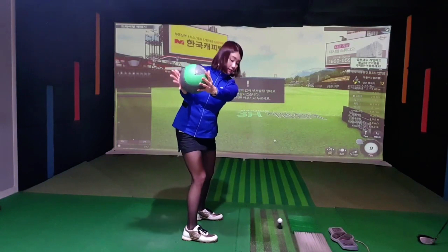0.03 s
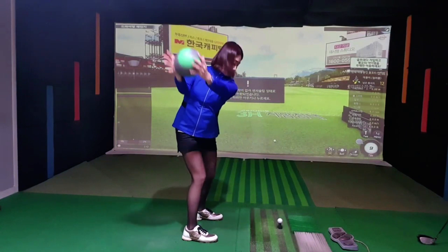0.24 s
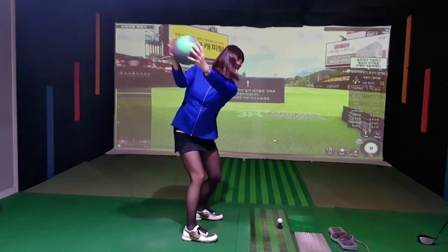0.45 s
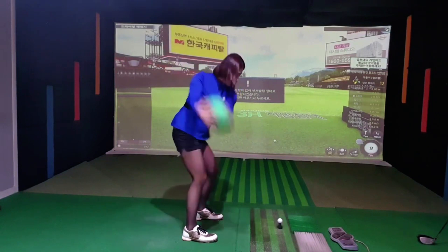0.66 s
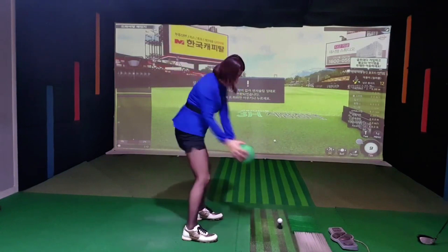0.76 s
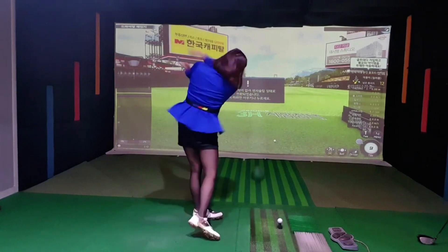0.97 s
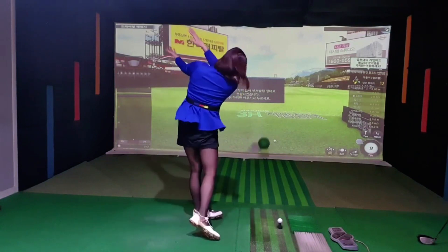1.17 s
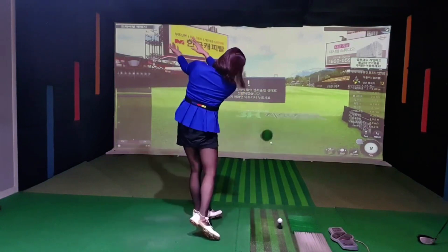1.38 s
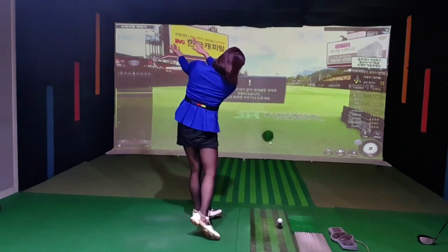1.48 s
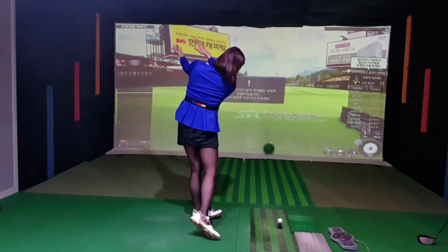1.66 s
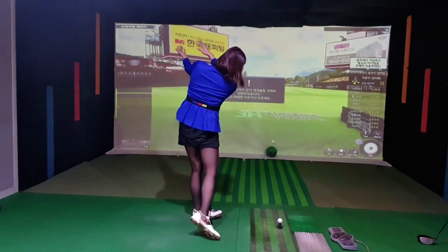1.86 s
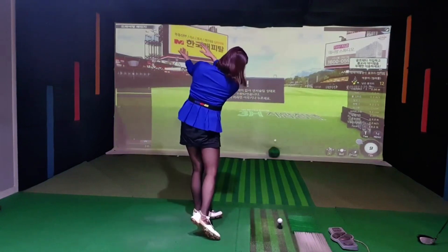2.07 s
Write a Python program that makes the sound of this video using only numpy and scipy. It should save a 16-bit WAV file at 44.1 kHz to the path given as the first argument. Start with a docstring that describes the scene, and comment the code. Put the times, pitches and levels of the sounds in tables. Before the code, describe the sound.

Deep booming thud of a heavy ball against a stretched cloth screen, followed by a lighter knock

```python
"""Inside a padded golf booth, a stereo pair of microphones hears ventilation (steady coloured noise) throughout.
A jacket swishes (rubbing noise) and the arms whoosh; a heavy rubber ball slaps the hanging screen (noise burst).
The ball's air rings, the screen thumps and snaps taut again (damped modes), and the booth booms on in the bass.
The ball knocks more lightly on the mat, the screen slides back with a hiss and a soft low bump,
and a soft scuff ends in a short tap."""
import sys
import numpy as np
from scipy.fft import rfft, irfft, next_fast_len
from scipy.io import wavfile
from scipy.ndimage import map_coordinates

SR = 44100
rng = np.random.default_rng(int(sys.argv[2]) if len(sys.argv) > 2 else 0)


def bounce(signal):
    """Save signal as a 16-bit WAV file at the path given by the first command-line argument."""
    frames = np.transpose(np.atleast_2d(signal))
    limited = np.clip(frames, -1, 1)
    pcm = np.round(limited * 32767).astype(np.int16)
    wavfile.write(sys.argv[1], SR, pcm)


N = 93844  # samples, about 2.13 s

# Ventilation: noise spectrum [f/Hz, relative density/dB]; its rms level
AIR_COLOUR = [(25, -12), (50, -3.5), (100, -1), (145, -7.5), (215, 0.5), (300, -3), (420, -7), (1100, -15),
              (2500, -25.5), (3500, -36), (7000, -40), (15500, -46)]
AIR_DB = -48.5
# Likeness of left and right in all noise [f/Hz, correlation]
LEFT_RIGHT_LIKENESS = [(250, .99), (700, 0.65), (1500, 0.34), (4000, 0.04)]
# Extra time to the right microphone, for the farther and the nearer-to-centre sounds
LEFT_LEAD_S, SLIGHT_LEAD_S = .00035, .00005
TOP_HZ = 15740  # band limit

# Jacket rubbing during the swing [t/s, level/dB before a random offset]
SWING_STROKE = [(0, -85), (.74, -68.5), (.82, -61), (.87, -55.5), (.915, -49.5), (.98, -54), (1.06, -57),
                (1.24, -64), (1.38, -80)]
# Jacket cloth: noise spectrum [f/Hz, relative density/dB]
JACKET_COLOUR = [(40, 11), (200, 16), (550, 10.5), (1000, 6), (6000, 1.5), (15500, -1.5)]
# Air pushed by the arms: noise spectrum [f/Hz, relative density/dB]
WHOOSH_COLOUR = [(350, -26), (540, 2), (800, -35)]
# Decay of the whoosh [f/Hz, t60/s]
WHOOSH_DECAY = [(500, 0.27)]

HIT_S, HIT_GIVE_S = 1.108, .01  # first touch; time until the screen pulls taut
# Slap of ball on cloth: noise spectrum [f/Hz, relative density/dB]
SLAP_COLOUR = [(150, 2), (500, 4.5), (900, 4.5), (1600, -2.5), (3200, -7), (4500, -13), (6500, -22),
               (12000, -24), (15500, -37)]
# Decay of the slap [f/Hz, t60/s]
SLAP_DECAY = [(300, 0.37), (2000, 0.33), (5000, 0.2), (10000, 0.23)]
# Thud of the cloth, under the screen's modes: noise spectrum [f/Hz, relative density/dB]
THUD_COLOUR = [(20, -9), (85, -4), (120, 7), (180, 4), (400, -4.5), (750, -15.5), (1400, -31), (4000, -77)]
# Decay of the thud [f/Hz, t60/s]
THUD_DECAY = [(50, .2), (1000, .23)]
THUD_DB = -26
# Modes of the struck screen once slack [f/Hz, level/dB at the first blow, t60/s]
SCREEN_MODES = [(40, -19, .4), (74, -11, .12), (105, -20, .12), (142, -19, .17), (185, -14, .13),
                (243, -16, .13), (300, -25, .17), (362, -21, .19), (520, -28, .16), (715, -32, .2)]
SCREEN_RISE_S, RISE_LAW = .0385, .46  # swell of a 100 Hz mode; higher modes swell sooner
TAUT_SHARP, SLACKEN_S = .15, .08  # starts sharp by this share, sinks with this time constant
WAVER_RAD, WAVERS_PER_S = .7, 35  # random phase wander of the screen's modes: size, points per second
REBOUND_S, REBOUND_DB = 1.205, -12.5  # the screen snaps taut once more, weaker than the blow

# Air inside the ball [f/Hz, level/dB at the screen, t60/s]
BALL_MODES = [(1125, -43, .25), (1357, -44, .25), (1795, -38.5, .16), (1990, -42, .16), (2164, -44, .24),
              (2403, -38, .19), (2930, -41, .15), (3480, -45, .15), (4170, -46, .15)]
BALL_ON_MAT_DB = -17  # relative to the ring at the screen
# Upper modes of the ball: level at 3 kHz before random strengths, change per octave, decay
OVERTONE_DB, OVERTONE_FALL_DB, OVERTONE_T60_S = -43.5, -4, .2

# Low resonances of the booth that outlast the blow [f/Hz, level/dB, t60/s]
BOOTH_MODES = [(75.5, -40, 1.6), (205, -34, .65)]
# Rumble of the booth: noise spectrum [f/Hz, relative density/dB]
BOOM_COLOUR = [(25, -9), (45, 6), (80, 2.5), (130, -7), (230, -3), (400, -17.5), (800, -20), (3000, -44.5)]
# Decay of the rumble [f/Hz, t60/s]
BOOM_DECAY = [(50, 3), (250, 3.1), (1000, 1.1)]
BOOM_DB = -42.5

KNOCK_S, KNOCK_DB = 1.402, -39.5  # the ball lands on the mat: time, level of the contact noise
# Contact of ball and mat: noise spectrum [f/Hz, relative density/dB]
KNOCK_COLOUR = [(60, -18), (230, -3), (600, -2), (1200, -5), (2500, -11), (5000, -31), (12000, -44)]
# Decay of the contact noise [f/Hz, t60/s]
KNOCK_DECAY = [(200, 0.12), (3000, 0.089)]
# Modes of the ball on the mat [f/Hz, level/dB, t60/s]
MAT_MODES = [(41, -28.5, .5), (228, -22, .085), (512, -35, .08), (1290, -43, .05)]

SLIDE_S, SLIDE_RISE_S, SLIDE_HOLD_S = 1.405, .02, .056  # hiss: start, swell, delay until it fades
# Hiss of the sliding screen: noise spectrum [f/Hz, relative density/dB]
SLIDE_COLOUR = [(60, 5), (300, 8), (700, 0.5), (1200, -2.5), (2300, 2), (4500, 2), (7000, -5.5),
                (11000, -6.5), (14000, -10), (15500, -17)]
# Decay of the hiss [f/Hz, t60/s]
SLIDE_DECAY = [(300, .7), (2500, .45), (6000, .29), (13000, .25)]
BUMP_S, BUMP_RISE_S = 1.505, .022  # soft low bump: start, swell
# Modes of the bump [f/Hz, level/dB, t60/s]
BUMP_MODES = [(100, -41, .16), (245, -41, .12), (322, -36, .14)]

# Rubbing of the scuff [t/s, level/dB before a random offset]
SCUFF_STROKE = [(1.45, -73), (1.58, -61), (1.69, -57), (1.76, -49), (1.855, -48), (1.89, -57), (1.97, -67),
                (2.12, -75)]
# Scuff: noise spectrum [f/Hz, relative density/dB]
SCUFF_COLOUR = [(60, 4), (300, 5), (800, 0), (1700, 0), (3300, -3.5), (5000, -10.5), (7000, -16),
                (12000, -17), (15500, -22)]
STOP_S, STOP_RISE_S, STOP_HOLD_S = 1.853, .006, .01  # closing tap: start, swell, delay until it fades
# Tap: noise spectrum [f/Hz, relative density/dB]
STOP_COLOUR = [(100, -2), (330, 7.5), (850, -4), (1300, 2), (1750, 0), (2200, -1), (4000, -9), (15000, -52)]
# Decay of the tap's noise [f/Hz, t60/s]
STOP_DECAY = [(300, 0.57), (1300, 0.22), (3000, 0.078)]
# Modes of the tap [f/Hz, level/dB, t60/s]
TAP_MODES = [(335, -46, .25), (1285, -49, .25), (1630, -41.5, .09), (1850, -48, .1)]


def amp(db):
    """Decibels to gain."""
    return 10 ** (np.asarray(db) / 20)


def unit(x):
    """Scale to rms 1."""
    return x / np.sqrt(np.mean(x ** 2) + 1e-20)


def along(points, hz):
    """Read (Hz, value) points on a log frequency axis."""
    f, value = np.transpose(points)
    return np.interp(np.log(hz + 1), np.log(f + 1), value)


def since(start):
    """Seconds since start, zero before it."""
    return np.maximum(np.arange(N) / SR - start, 0)


def swell(t, rise):
    """A smooth onset from 0 to 1."""
    return 1 - np.exp(-(t / rise) ** 2)


def filtered(x, response):
    """Multiply the spectrum of x by a response of frequency."""
    size = next_fast_len(N + SR // 4)
    spectrum = rfft(x, size) * response(np.fft.rfftfreq(size, 1 / SR))
    return irfft(spectrum, size)[..., :N]


def noise(colour):
    """Coloured stereo noise of rms 1, near mono in the bass."""
    def mid_side_response(hz):
        # this angle between mid and side gives the wanted left-right correlation
        angle = np.arccos(np.clip(along(LEFT_RIGHT_LIKENESS, hz), -1, 1)) / 2
        return amp(along(colour, hz)) * [np.cos(angle), np.sin(angle)]

    mid, side = filtered(rng.standard_normal((2, N)), mid_side_response)
    return unit(np.array([mid + side, mid - side]))


def fading(x, age, t60):
    """Let each of six overlapping bands of x die at its own speed."""
    centres = np.geomspace(50, 12800, 6)  # Hz
    out = 0
    for hz, weight in zip(centres, np.eye(len(centres))):
        crossfade = list(zip(centres, weight))
        band = filtered(x, lambda f: along(crossfade, f))
        out = out + band * amp(-60 * age / along(t60, hz))
    return out


def burst(start, colour, t60, level_db, rise, hold):
    """Noise that swells, holds and dies away; times in seconds."""
    body = fading(noise(colour), since(start + hold), t60)
    return amp(level_db) * swell(since(start), rise) * body


def ring(start, modes, rise, law=0, scatter=0, cloth=False):
    """Damped modes: law makes low ones swell slower, scatter (rad) parts the sides, cloth sinks and wavers."""
    t, out = since(start), np.zeros((2, N))
    for hz, db, t60 in modes:
        own_rise = rise * (100 / hz) ** law
        phase = 2 * np.pi * hz * t + scatter * rng.uniform(-.75, 1, (2, 1))
        if cloth:
            # a sharp start that sinks to the mode's own pitch
            phase += 2 * np.pi * hz * TAUT_SHARP * SLACKEN_S * (1 - np.exp(-t / SLACKEN_S))
            phase += WAVER_RAD * map_coordinates(rng.standard_normal(N), [t * WAVERS_PER_S])
        decay = amp(db - 60 * np.maximum(t - own_rise, 0) / t60)
        out += decay * swell(t, own_rise) * np.sin(phase)
    return out


def rubbing(stroke, colour):
    """Friction noise that follows a stroke, with a random level offset that hardly drifts."""
    t = since(0)
    offset_db = 1.2 * map_coordinates(rng.standard_normal(N), [t * 300 / SR], order=1)
    stroke_db = np.interp(t, *np.transpose(stroke))
    return amp(stroke_db + offset_db) * noise(colour)


def leading(x, lead):
    """Stereo sound that reaches the left microphone lead seconds before the right."""
    sides = np.array([[1], [-1]])
    return filtered(x, lambda hz: np.exp(1j * np.pi * hz * lead * sides))


def ventilation():
    """Moving air makes a steady noise, strongest in the bass."""
    return amp(AIR_DB) * noise(AIR_COLOUR)


def swing():
    """The jacket swishes by friction, and the arms push a low whoosh of air."""
    jacket = rubbing(SWING_STROKE, JACKET_COLOUR)
    whoosh = burst(.87, WHOOSH_COLOUR, WHOOSH_DECAY, level_db=-49.5, rise=.023, hold=.06)
    return jacket + whoosh


def screen_thump(start):
    """The stretched screen rings in low modes that start sharp and sink as it slackens."""
    return ring(start, SCREEN_MODES, SCREEN_RISE_S, RISE_LAW, cloth=True)


def screen_hit():
    """The ball slaps the cloth; the screen pulls taut, thumps and rebounds."""
    slap = burst(HIT_S, SLAP_COLOUR, SLAP_DECAY, level_db=-28.5, rise=.0027, hold=.026)
    taut = HIT_S + HIT_GIVE_S
    thud = burst(taut, THUD_COLOUR, THUD_DECAY, level_db=THUD_DB, rise=.014, hold=.064)
    rebound = amp(REBOUND_DB) * screen_thump(REBOUND_S)
    return slap + thud + screen_thump(taut) + rebound


def ball_overtones(count):
    """The ball's crowded upper modes, each with its own strength and phase on either side."""
    t, out = since(HIT_S), np.zeros((2, N))
    for k, (place, left, right, shift) in enumerate(rng.random((count, 4))):
        hz = 2500 + 13000 * (k + 2 * place) / count
        turns = hz * t + np.array([[place], [shift]])
        pair = np.array([[left], [right]]) * np.sin(2 * np.pi * turns)
        out += pair * amp(OVERTONE_FALL_DB * np.log2(hz / 3000))
    return out * amp(OVERTONE_DB - 60 * t / OVERTONE_T60_S) * swell(t, .008)


def ball_ring():
    """The air inside the ball rings at the screen, and faintly on the mat."""
    on_screen = ring(HIT_S, BALL_MODES, rise=.01, scatter=2.04) + ball_overtones(count=48)
    on_mat = amp(BALL_ON_MAT_DB) * ring(KNOCK_S, BALL_MODES, rise=.0017, scatter=.63)
    return on_screen + on_mat


def booth_boom():
    """After the blow the padded booth rings and rumbles on in the bass."""
    resonances = ring(HIT_S, BOOTH_MODES, SCREEN_RISE_S)
    rumble = burst(HIT_S, BOOM_COLOUR, BOOM_DECAY, level_db=BOOM_DB, rise=.018, hold=.45)
    return resonances + rumble


def mat_knock():
    """The ball lands on the mat: contact noise and a short hollow knock of damped modes."""
    contact = burst(KNOCK_S, KNOCK_COLOUR, KNOCK_DECAY, level_db=KNOCK_DB, rise=.001, hold=.007)
    return contact + ring(KNOCK_S, MAT_MODES, rise=.007, law=.9)


def screen_slide():
    """The slack screen swings back with a hiss of cloth and settles with a soft bump."""
    hiss = burst(SLIDE_S, SLIDE_COLOUR, SLIDE_DECAY, level_db=-37.5, rise=SLIDE_RISE_S, hold=SLIDE_HOLD_S)
    return hiss + ring(BUMP_S, BUMP_MODES, BUMP_RISE_S)


def scuff():
    """A soft friction noise, perhaps a shoe turning on the mat, grows and ends in a short tap."""
    tap_noise = burst(STOP_S, STOP_COLOUR, STOP_DECAY, level_db=-42.5, rise=STOP_RISE_S, hold=STOP_HOLD_S)
    tap = tap_noise + ring(STOP_S, TAP_MODES, STOP_RISE_S)
    return rubbing(SCUFF_STROKE, SCUFF_COLOUR) + tap


def scene():
    """The throw and its sequel in the booth, over the ventilation, by their lead at the left microphone."""
    left_first = ventilation() + swing() + screen_hit() + booth_boom() + mat_knock()
    near_centre = ball_ring() + screen_slide() + scuff()
    return leading(left_first, LEFT_LEAD_S) + leading(near_centre, SLIGHT_LEAD_S)


def record(dry):
    """Nothing is kept above the band limit."""
    return filtered(dry, lambda hz: hz < TOP_HZ)


dry = scene()
out = record(dry)
bounce(out)
```